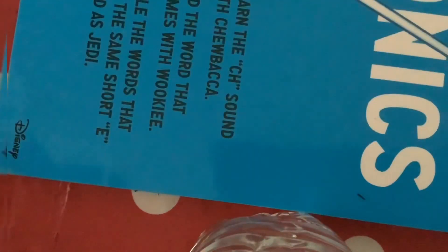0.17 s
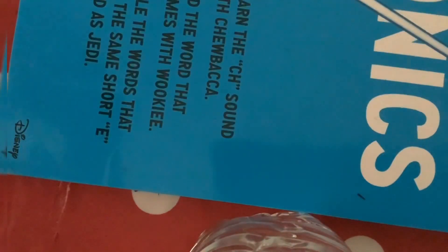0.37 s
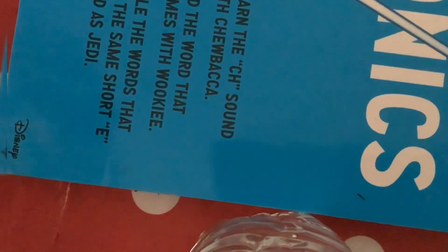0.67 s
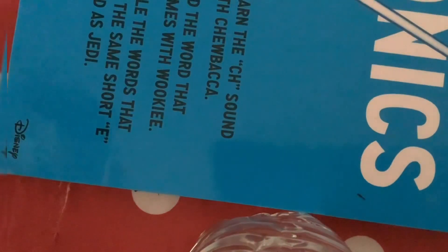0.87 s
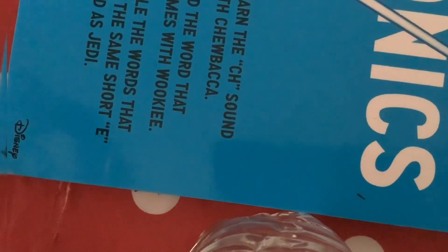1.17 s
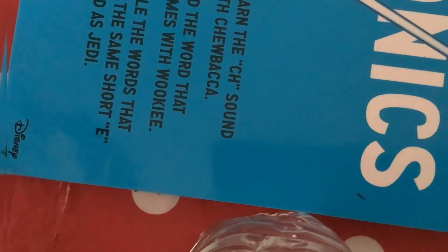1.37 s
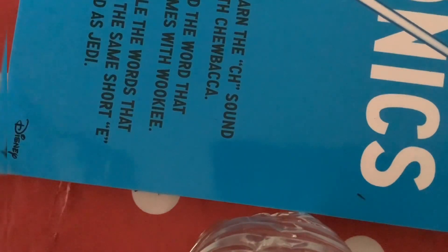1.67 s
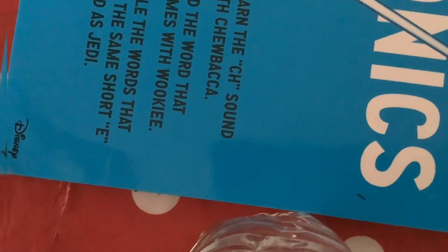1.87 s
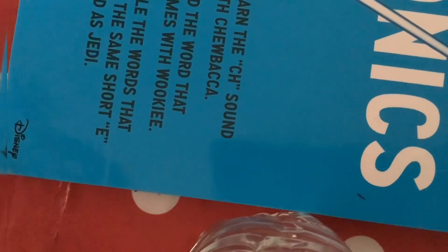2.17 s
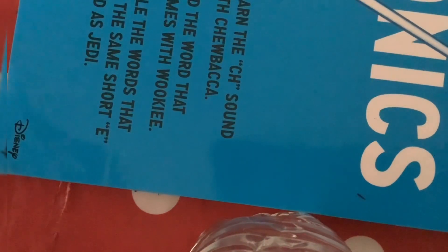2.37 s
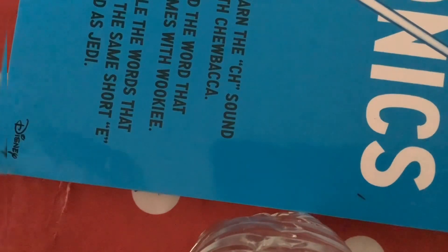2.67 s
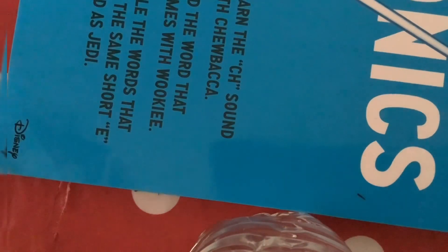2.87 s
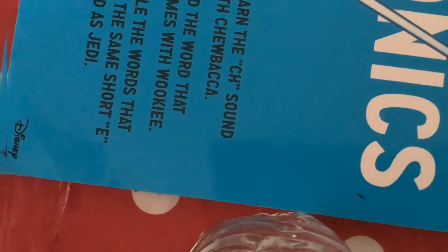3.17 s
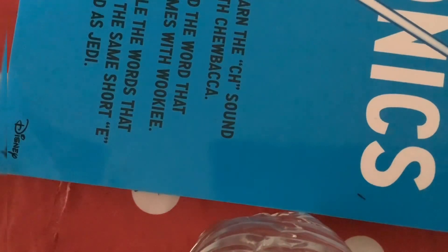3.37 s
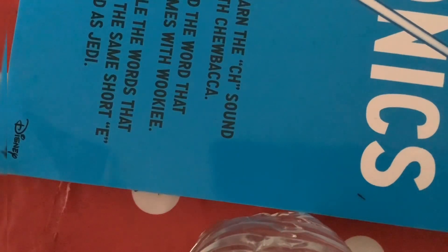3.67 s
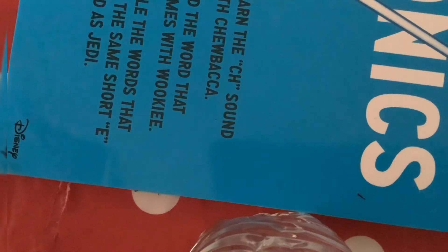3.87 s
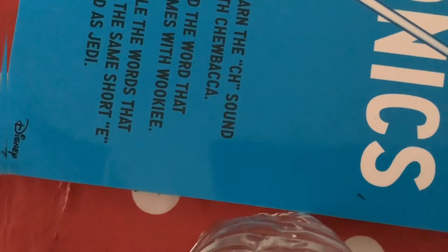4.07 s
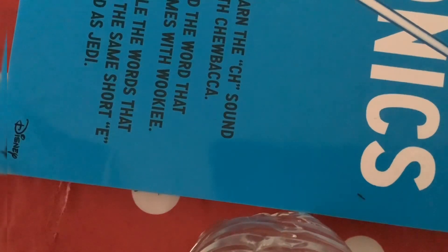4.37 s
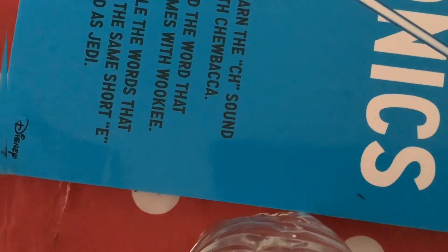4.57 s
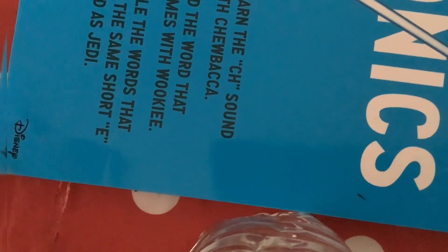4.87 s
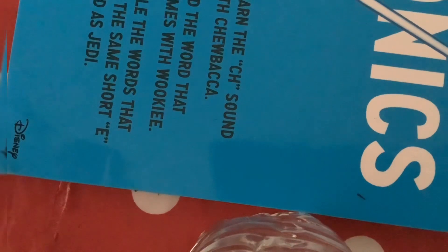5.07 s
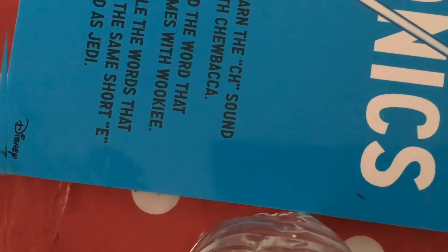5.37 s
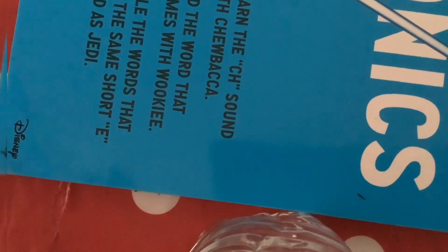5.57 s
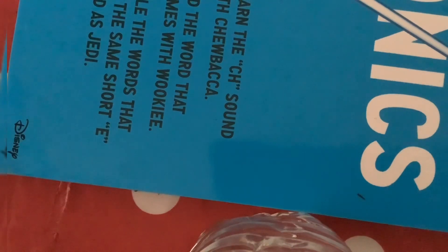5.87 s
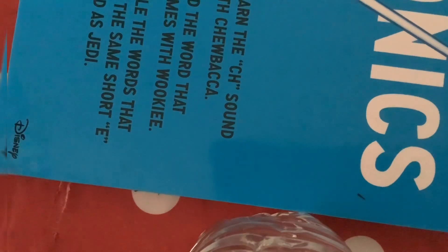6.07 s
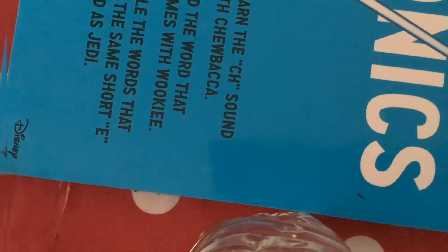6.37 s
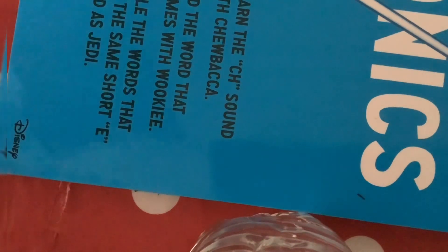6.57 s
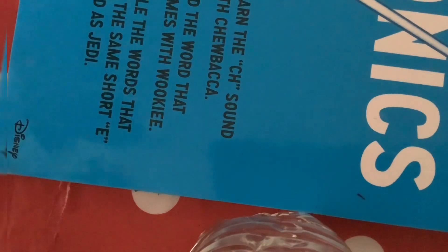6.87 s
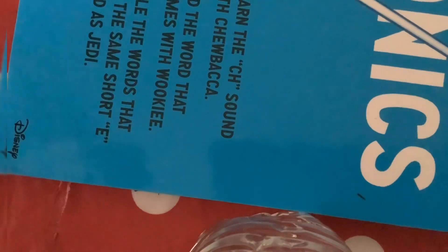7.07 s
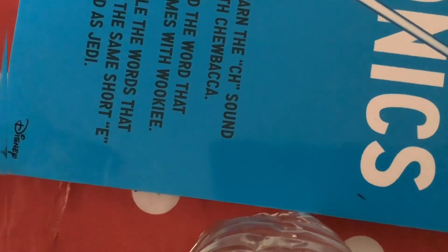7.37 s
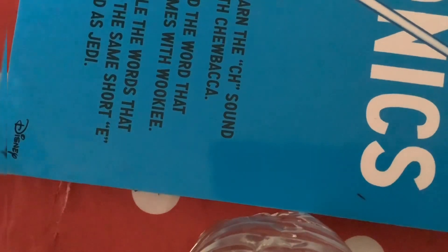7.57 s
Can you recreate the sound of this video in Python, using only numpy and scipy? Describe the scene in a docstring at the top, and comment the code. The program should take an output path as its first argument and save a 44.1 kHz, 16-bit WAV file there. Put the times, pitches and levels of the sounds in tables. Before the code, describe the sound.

Close to the microphone in a small room, a paper workbook and pencil are handled on a table. Quick light taps come first, then soft sliding rustles with fewer knocks. Firmer taps and brisk, hissing scrapes build up in the middle, leading to one sharp, loudest tap. It then falls nearly quiet, with a last firm tap and faint slides over a low hum.

```python
"""Hands shift a paper workbook and a pencil on a table, close to the microphone, in a small room.
First come quick light taps; from about one second paper slides and rustles between fewer taps.
Near four seconds come firmer taps, then the strongest slides up to five and a half; the loudest tap is at six.
Weak taps and slides follow, then a firm tap at 7.4 seconds and two faint slides. Each tap is shaped noise
plus ringing table tones; each slide is filtered noise. A faint low hum and hiss lie underneath throughout."""
import sys
import numpy as np
from scipy import signal
from scipy.fft import rfft, irfft, next_fast_len
from scipy.io import wavfile
from scipy.ndimage import map_coordinates

SR = 44100
rng = np.random.default_rng(int(sys.argv[2]) if len(sys.argv) > 2 else 0)


def wav_out(sig):
    """Save sig, one row per channel (or a flat mono array), as 16-bit PCM at SR to the path in sys.argv[1]."""
    wavfile.write(sys.argv[1], SR, np.round(np.clip(np.atleast_2d(sig).T, -1, 1) * 32767).astype(np.int16))


N = 339548  # length of the scene in samples

# Light taps on the book and the table. Each row: start in seconds, level in dB, hardness in dB
# (below 0 a dull knock, above 0 a crisp snap), pencil tick in dB and table thump in dB, both against the level.
TAP_EVENTS = [(0.097, -33, 4.5, -1, 3), (0.142, -49.5, 4, 3.5, 0), (0.336, -47, 9, -2, -1),
              (0.352, -55, 0, -16, 19), (0.393, -54.5, -5, -9, 13.5), (0.479, -54, 1, 4, 3),
              (0.526, -51, -2.5, -9, 5.5), (0.587, -56, -3, -10, 14), (0.603, -42, 4, -2, -8),
              (0.635, -42, -5, -1.5, -8), (0.69, -59, 9, 0.5, 10.5), (0.932, -54, 10, 4.5, 3),
              (0.989, -49.5, -2.5, 5, 0.5), (1.014, -40.5, 3, 2, -12), (1.133, -66, 8, 0, 7.5),
              (2.147, -54, 1, -13, 9), (2.25, -35.5, 1, -6, -4), (2.257, -35, 4.5, 0, 0.5),
              (2.382, -50.5, -7, 11.5, 2.5), (2.566, -49.5, -1, -2, -7), (2.669, -32.5, 3, -5.5, -11),
              (2.927, -72.5, -16, -15, 21), (2.972, -58.5, -11, -1, 14.5), (3.396, -45.5, 2.5, -9, 4.5),
              (3.534, -62.5, -3.5, -6, 9.5), (3.68, -64, -15.5, 7.5, 18.5), (3.945, -34.5, -3.5, 7, -6),
              (3.966, -28.5, 1.5, 5, -3), (4.133, -55, -9, -14, 12.5), (4.168, -54.5, 10, -6, -3),
              (4.207, -57.5, -6, -15, 1), (4.286, -32, 7, 8.5, -15), (4.308, -47.5, -6.5, -1, 0),
              (5.166, -40, 5, 4, 7), (5.192, -39.5, 8, 8.5, 3.5), (5.514, -45, 8, 0.5, -18),
              (5.529, -31.5, 7, 2, -20.5), (5.55, -42, 18, 5, -3.5), (5.954, -75.5, 21, -8, -1.5),
              (5.977, -65.5, 8, -8, 2), (6.044, -21, 7, -8.5, -15.5), (6.066, -44, -9, 3, 7),
              (6.377, -55.5, -7.5, -13, 7), (6.412, -58.5, -4.5, -3, 1), (6.648, -65.5, 16, -14, -5),
              (6.668, -61, 11.5, -11, 0.5), (6.69, -51, 10, 1, -5.5), (6.941, -60, -15.5, 0, 8.5),
              (7.119, -60.5, 7, 7.5, -33.5), (7.39, -29, 7.5, 1, 5), (7.399, -45.5, -12, -10, -4)]
# What every tap starts from, in dB against its level; hardness and tick are then applied to these.
KNOCK_DB, TICK_DB, SNAP_DB = 1.2, -1.57, -8.5


def taps():
    """Pencil, fingertips and paper edges meet the book and the table; a harder contact trades knock for snap."""
    out = np.zeros(N)
    for start_s, level_db, hardness_db, tick_db, thump_db in TAP_EVENTS:
        knock_db = KNOCK_DB - hardness_db
        snap_db = SNAP_DB + hardness_db
        add(out, start_s, tap(level_db, thump_db, knock_db, TICK_DB + tick_db, snap_db))
    return out


# Tone colour of a tap's soft knock. Each row: frequency in Hz, relative strength in dB per Hz.
KNOCK_SPECTRUM = [(300, -24), (680, -9), (950, -1), (1300, -1.5), (1700, 3), (2600, 4.5), (3700, -4),
                  (5500, -11.5), (10000, -42)]
# Tone colour of its hard tick. Each row: frequency in Hz, relative strength in dB per Hz.
TICK_SPECTRUM = [(1500, -23.5), (3000, 0), (4500, 1), (7500, -1.5), (9500, -5), (11500, -21),
                 (16000, -32.5)]
# Tone colour of its crisp snap, and of the fizz of sliding paper.
# Each row: frequency in Hz, relative strength in dB per Hz.
FIZZ_SPECTRUM = [(5000, -38), (8500, -5), (10500, 0), (12000, -1.5), (14000, 1), (16000, -3)]
# Tones of the table top with the book on it. Each row: frequency in Hz (shifted a little at each tap),
# relative strength in dB, time in seconds to die away by 60 dB.
TABLE_MODES = [(86.5, -23, 0.19), (135, -20.5, 0.26), (231, -14, 0.15), (321, -1, 0.042),
               (410, -4.5, 0.038), (520, -5.5, 0.055), (587, -1, 0.029), (826, -1, 0.034),
               (1043, -5.5, 0.046), (1313, 1.5, 0.015)]


def tap(level_db, thump_db, knock_db, tick_db, snap_db, touch_s=0.0013, tick_s=0.0015, knock_s=0.0028,
        rattle_s=0.02, rattle_db=-21):
    """A crunch of contact builds for about a millisecond; paper rattles briefly and the table rings."""
    t = np.arange(SR // 7) / SR
    press = np.clip(t / touch_s, 0, 1)
    since = np.maximum(t - touch_s, 0)
    rattle = amp(rattle_db) * np.exp(-since / rattle_s)
    contact = np.zeros(len(t))
    parts = ((knock_db, KNOCK_SPECTRUM, knock_s), (tick_db, TICK_SPECTRUM, tick_s),
             (snap_db, FIZZ_SPECTRUM, tick_s))
    for db, spectrum, decay_s in parts:
        crunch = press * (np.exp(-since / decay_s) + rattle) * rng.standard_normal(len(t))
        contact += amp(db) * blow(colour(crunch, spectrum, size=1024))
    # each spot on the table rings a little differently
    hz, db, t60 = np.transpose(TABLE_MODES)[:, :, None]
    spot, phase = rng.uniform(-1, 1, (2, len(TABLE_MODES), 1))
    ringing = np.sin(2 * np.pi * hz * (1 + 0.064 * spot) * t + np.pi * phase)
    thump = press * np.sum(amp(db - 60 * t / t60) * ringing, 0)
    return amp(level_db) * (contact + amp(thump_db) * blow(thump))


def blow(x, span_s=0.0052):
    """Scales a short sound to the energy of span_s seconds at an rms (average strength) of one."""
    return x * np.sqrt(span_s * SR / (np.sum(x ** 2) + 1e-20))


# Tone colour of the paper's hiss. Each row: frequency in Hz, relative strength in dB per Hz.
HISS_SPECTRUM = [(1500, -19), (3000, -0.5), (4300, 1), (6500, -0.5), (9500, -1), (11000, -8.5),
                 (13000, -26), (16000, -26)]
# Tone colour of its rasp. Each row: frequency in Hz, relative strength in dB per Hz.
RASP_SPECTRUM = [(250, -11.5), (480, -6), (680, -6), (850, 1.5), (1300, -3.5), (1700, -1), (2600, -0.5),
                 (3400, -5), (5000, -32.5)]
# Tone colour of the table's rumble. Each row: frequency in Hz, relative strength in dB per Hz.
RUMBLE_SPECTRUM = [(30, -36.5), (55, -7.5), (90, 1), (200, 1), (320, -2), (520, -1.5), (700, -9.5),
                   (1400, -24)]


def slides(snags_per_s=2000, snag_spread_db=2.5, smooth=1.31, slip_hz=90, slip_db=1.5,
           patchy_hz=35, patchy_db=1.5):
    """Paper fibres snag and let go unevenly; the sheet hisses, fizzes and rasps, the table rumbles."""
    caught = rng.random(N) < snags_per_s / SR
    snag_size = amp(snag_spread_db * np.minimum(rng.exponential(1, N), 4))
    snags = unit(caught * snag_size)
    slip = slip_db * wander(slip_hz)  # shared by all four layers
    spectra = (HISS_SPECTRUM, FIZZ_SPECTRUM, RASP_SPECTRUM, RUMBLE_SPECTRUM)
    trims_db = (-1.0, -2.0, -2, -2.5)
    out = np.zeros(N)
    for gain, spectrum, trim_db in zip(paper_gains(), spectra, trims_db):
        grip = amp(slip + patchy_db * wander(patchy_hz))
        friction = grip * (snags * rng.choice([-1, 1], N) + smooth * rng.standard_normal(N))
        out += amp(trim_db) * gain * unit(colour(friction, spectrum))
    return out


# Strokes of sliding paper; slides() trims these levels by 1 to 2 dB. Each row: start in seconds,
# length in seconds, hiss in dB, where it is fastest (0 start to 1 end), fizz in dB over the hiss,
# pressure as dB of rasp over the hiss.
PAPER_STROKES = [(0.0, 0.091, -53, 0, -5, -5.5), (0.207, 0.16, -66.5, 0.7, -3, 1.5),
                 (0.484, 0.098, -54, 0.7, 1.5, -2.5), (0.585, 0.06, -49, 0.93, 4, -0.5),
                 (0.911, 0.19, -58, 0.4, -0.5, -1), (1.091, 0.11, -69, 0.15, 9, 1),
                 (1.25, 0.18, -65, 0.54, 1, -3), (1.436, 0.18, -63.5, 0.74, 1, 1.5),
                 (1.58, 0.27, -56.5, 0.34, -2, -7.5), (1.827, 0.23, -57.5, 0.1, -3.5, -5),
                 (1.958, 0.16, -56, 1, 2.5, -3.5), (2.113, 0.26, -55.5, 0.1, 0.5, -2.5),
                 (2.267, 0.19, -57, 0.5, 1.5, 1), (2.429, .1, -46.5, 0.62, -0.5, -2.5),
                 (2.511, 0.096, -50.5, 0.77, -2, -8.5), (2.603, 0.091, -60, 0.55, 2, 0),
                 (3.143, 0.19, -67, .55, -2, 2), (3.356, .13, -58.5, 0.84, -3, 2.5),
                 (3.49, 0.1, -67, 0.85, -2, -7), (3.606, .055, -72.5, 0.2, 9.5, -1),
                 (4.046, 0.1, -53, 0, 1.5, 7), (4.194, 0.16, -60, 0.27, 1.5, -0.5),
                 (4.34, 0.12, -47.5, 0.8, 1.5, -5), (4.558, 0.029, -49, .7, -5, -8),
                 (4.588, 0.071, -38.5, .45, 1.5, -6), (4.66, 0.096, -63, 0.24, -5, -5),
                 (4.775, .12, -58.5, 0.66, 0, -5.5), (4.9, 0.04, -54, .4, 5, -14),
                 (4.943, 0.083, -46.5, 0.24, 7.5, -6.5), (5.06, 0.12, -53, 0.23, 1, -4.5),
                 (5.16, 0.047, -36.5, 0.46, 0.5, -2), (5.219, 0.046, -41.5, 0.3, 4.5, 0),
                 (5.464, 0.062, -33, 0.25, 0, -18), (5.511, .13, -34.5, 0.46, 2.5, -8.5),
                 (6.298, 0.17, -73, 0.26, 13.5, 4), (6.431, 0.094, -58.5, 0.6, 6, -11),
                 (6.53, .07, -76, 0.95, 20, 4), (7.087, 0.15, -66.5, 0.05, -2, 0),
                 (7.337, 0.057, -56, 0.54, -2, -7), (7.509, 0.085, -59.5, 0.86, 3.5, -20),
                 (7.656, 0.054, -66.5, 0.9, 0, -2.5)]
# A sheet flaps and settles after a blow; slides() trims these too. Each row: start in seconds,
# rasp in dB, decay in seconds, hiss in dB over the rasp.
SHEET_FLAPS = [(0.1, -51, .03, -29), (0.34, -40.5, 0.05, -17), (2.672, -31, 0.021, -8.5),
               (2.743, -39, 0.043, -10.5), (3.948, -36.5, .015, -17), (3.97, -46, 0.036, -19),
               (5.245, -56, 0.06, 5.5), (6.049, -37.5, 0.046, -12), (7.401, -40.5, 0.048, -8.5)]
FLAP_FIZZ_DB = -10  # against the flap's hiss
# The table rumbles with the pressure on it. Each row: rasp in dB, rumble in dB, both before trimming.
RUMBLE_FROM_RASP = [(-100, -90), (-61.5, -61), (-45.5, -45), (-29, -42)]


def paper_gains():
    """Strength of hiss, fizz, rasp and rumble over time; next to nothing while the hands rest."""
    moves = []
    for start_s, length_s, hiss_db, fastest, fizz_db, pressure_db in PAPER_STROKES:
        levels = (hiss_db, hiss_db + fizz_db, hiss_db + pressure_db)
        moves.append((start_s - TOUCH_S, stroke(length_s, fastest), levels))
    for start_s, rasp_db, decay_s, hiss_db in SHEET_FLAPS:
        levels = (rasp_db + hiss_db, rasp_db + hiss_db + FLAP_FIZZ_DB, rasp_db)
        moves.append((start_s, flap(decay_s), levels))
    # overlapping moves add up in power
    power = np.zeros((3, N))
    for start_s, shape, levels in moves:
        for layer, db in zip(power, levels):
            add(layer, start_s, (amp(db) * shape) ** 2)
    rasp_db = 10 * np.log10(power[2] + 1e-20)
    rumble = amp(np.interp(rasp_db, *np.transpose(RUMBLE_FROM_RASP)))
    return [*np.sqrt(power), rumble]


# A stroke's level at its start and end (dB under its fastest), and the shape of the arch between.
STROKE_START_DB, STROKE_END_DB, STROKE_ARCH = -6.5, -11, 1.55
TOUCH_S, LIFT_S = 0.013, 0.028  # fades in seconds as the paper is touched and let go


def stroke(length, fastest):
    """The paper is touched, speeds up, slows down and is let go, and the loudness follows."""
    t = np.arange(-TOUCH_S, length + LIFT_S, 1 / SR)
    crest = length * np.clip(fastest, 0.05, 0.95)
    away = abs(np.interp(t, [0, crest, length], [-1, 0, 1])) ** STROKE_ARCH
    touching = np.interp(t, [-TOUCH_S, 0, length, length + LIFT_S], [0, 1, 1, 0]) ** 2
    return touching * amp(away * np.where(t < crest, STROKE_START_DB, STROKE_END_DB))


def flap(decay_s, rise_s=0.0027):
    """A sheet is jolted almost at once and comes to rest."""
    t = np.arange(SR // 3) / SR
    return np.minimum(t / rise_s, 1) * np.exp(-t / decay_s)


# A hand comes down on the book. Each row: start in seconds, strength in dB before thuds() doubles and shapes it.
HAND_THUDS = [(0.362, -49), (2.259, -45), (2.471, -48), (4.63, -55), (5.548, -45), (6.057, -43.5)]


def thuds(rise_s=0.012, decay_s=0.024, thud_hz=80, spread=0.36):
    """The weight of a hand lands on the book: a soft, deep push, its pitch varying from thud to thud."""
    t = np.arange(SR // 4) / SR
    out = np.zeros(N)
    spots = rng.uniform(-1, 1, len(HAND_THUDS))
    for (start_s, db), spot in zip(HAND_THUDS, spots):
        swing = np.sin(2 * np.pi * thud_hz * (1 + spread * spot) * t)
        push = (1 - np.exp(-t / rise_s)) * np.exp(-t / decay_s)
        add(out, start_s, amp(db) * 2 * swing * push)
    return out


MIRROR_MS, MIRROR_DB = 0.797, -6.5  # middle delay and level of the reflection


def mirrored(x, roam=0.289, roam_hz=3):
    """The reflection off the table top shifts as the hands move, so the colour drifts."""
    delay = MIRROR_MS * SR / 1000 * np.exp(roam * wander(roam_hz))  # in samples
    reflection = map_coordinates(x, [np.arange(N) - delay], order=3)
    return x + amp(MIRROR_DB) * reflection


# Resonances of the book's hollow (low) and the microphone's housing (high).
# Each row: frequency in Hz, width in Hz, level in dB against the direct sound.
CAVITIES = [(783, 100, -17), (980, 79, -13.5), (1222, 150, -10), (2440, 52, -13.5), (4480, 490, -9.5),
            (5230, 130, -3.5), (6200, 100, -7), (7420, 220, -6.5), (8540, 390, -10), (9560, 150, -5.5),
            (10160, 300, -11.5), (12800, 600, -12.5)]


def housing(x):
    """The hollow under the book and the cavities around the microphone colour every handling sound."""
    out = x.copy()
    for hz, width_hz, db in CAVITIES:
        b, a = signal.iirpeak(hz, hz / width_hz, SR)
        out += amp(db) * signal.lfilter(b, a, x)
    return out


# How fast the room's tail dies. Each row: frequency in Hz, time in seconds to fall by 60 dB.
ROOM_DECAY = [(100, 0.4), (400, 0.45), (1200, 0.41), (3000, 0.4), (9000, 0.62), (16000, 0.35)]
# How strong the tail is. Each row: frequency in Hz, level in dB before room() applies tail_db.
ROOM_COLOUR = [(100, -4), (400, -4.5), (1500, -9), (4000, -12), (9000, -18.5), (16000, -18)]


def room(x, first_s=0.0046, tail_db=-1):
    """The room answers with a dense tail of decaying noise, each band dying at its own speed."""
    hz, t, z = signal.stft(rng.standard_normal(SR // 2), SR, nperseg=256)
    z = z * amp(-60 * t / read(ROOM_DECAY, hz)[:, None])
    even = z / np.linalg.norm(z, axis=1, keepdims=True)  # equal energy in each band
    tail = signal.istft(even, SR, nperseg=256)[1]
    tail = amp(tail_db) * colour(tail / np.linalg.norm(tail), ROOM_COLOUR)
    out = np.zeros(N)
    add(out, first_s, signal.fftconvolve(x, tail))
    return out


# Tone colour of the still air in the room. Each row: frequency in Hz, relative strength in dB per Hz.
AIR_SPECTRUM = [(15, -49), (25, -8.5), (97, -5), (170, -5), (427, -13), (911, -28.5), (2220, -37),
                (2690, -28.5), (6560, -39), (7710, -35), (8830, -36), (12900, -41), (16000, -37.5)]
AIR_DB = -62.5
HUM_HZ, HUM_DB = 149.3, -65.5


def background(waver=0.94, waver_hz=9):
    """Steady room noise and a wavering low hum, as of a fan."""
    air = amp(AIR_DB) * unit(colour(rng.standard_normal(N), AIR_SPECTRUM))
    # the complex swing wavers both loudness and phase
    swing = 1 + waver * (wander(waver_hz) + 1j * wander(waver_hz))
    hum = (swing * np.exp(2j * np.pi * HUM_HZ * np.arange(N) / SR)).real
    return air + amp(HUM_DB) * unit(hum)


def amp(db):
    """Turns decibels into gain."""
    return 10 ** (np.asarray(db) / 20)


def unit(x):
    """Scales to an rms (average strength) of one."""
    return x / np.sqrt(np.mean(x ** 2) + 1e-20)


def read(points, hz):
    """Reads between a table's rows on a log-frequency axis."""
    f, value = np.transpose(points)
    return np.interp(np.log(hz + 1), np.log(f + 1), value)


def add(mix, s, sound):
    """Mixes a sound in at time s, in seconds."""
    part = mix[max(round(s * SR), 0):][:len(sound)]
    part += sound[:len(part)]


def colour(x, spectrum, size=4096):
    """Filters to the given spectrum without sounding ahead of time, so attacks stay sharp."""
    log_gain = np.log(amp(read(spectrum, abs(np.fft.fftfreq(size, 1 / SR)))))
    # minimum phase: the energy comes as early as it can
    response = np.fft.ifft(np.exp(np.conj(signal.hilbert(log_gain)))).real
    return signal.fftconvolve(x, response[:size // 2])[:len(x)]


def wander(rate_hz):
    """Smooth random motion of rms one, mostly slower than the given rate."""
    size = next_fast_len(N, True)
    hz = np.fft.rfftfreq(size, 1 / SR)
    slow = rfft(rng.standard_normal(size)) / (1 + (hz / rate_hz) ** 4)
    return unit(irfft(slow, size)[:N])


def scene():
    """Taps, slides and thuds on the table, in the room."""
    handling = housing(mirrored(taps() + slides() + thuds()))
    return (handling + room(handling) + background())[None]


EDGE_HZ = 15900  # upper band limit


def record(dry):
    """The microphone's bass cut, then the band limit."""
    bass_cut = signal.butter(4, 48, "highpass", fs=SR, output="sos")
    thinned = signal.sosfilt(bass_cut, dry)
    band_limit = signal.firwin(511, EDGE_HZ, window=("kaiser", 9), fs=SR)
    return signal.oaconvolve(thinned, band_limit[None], "same")


dry = scene()
out = record(dry)
wav_out(out)
```